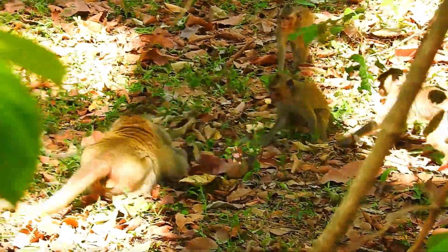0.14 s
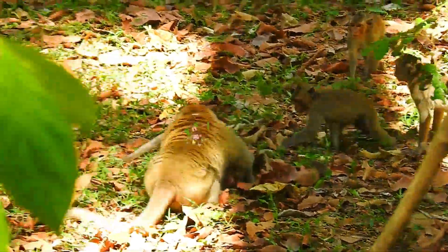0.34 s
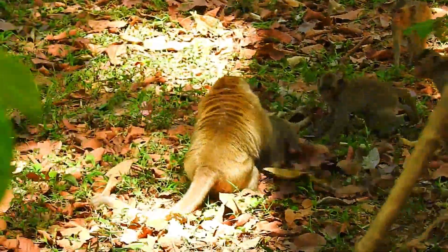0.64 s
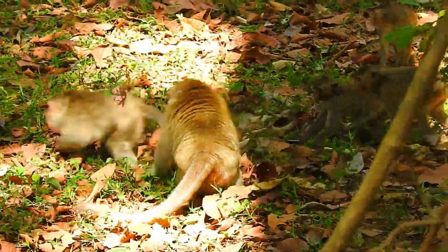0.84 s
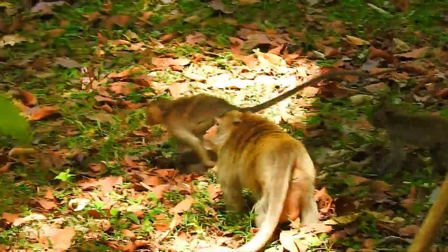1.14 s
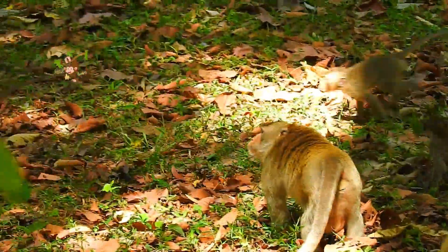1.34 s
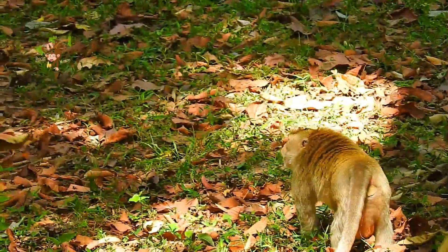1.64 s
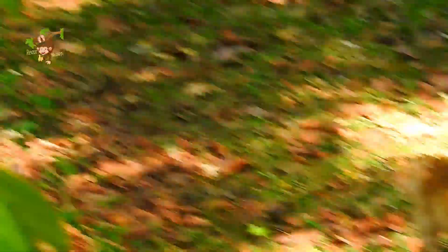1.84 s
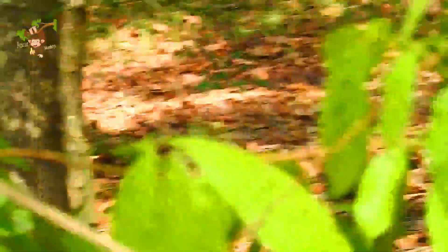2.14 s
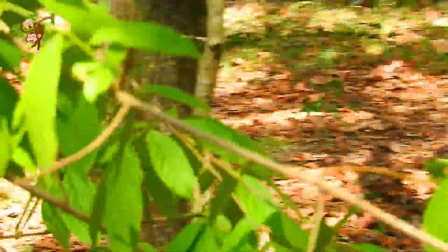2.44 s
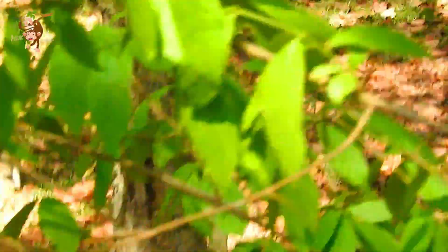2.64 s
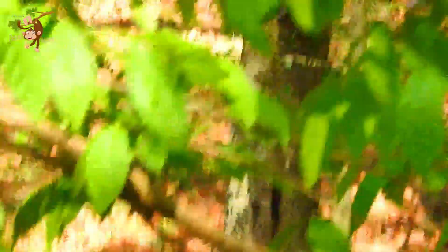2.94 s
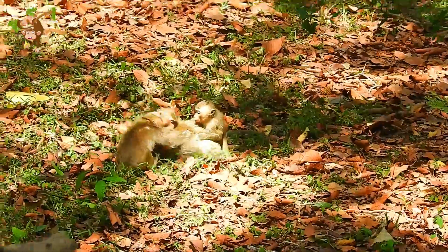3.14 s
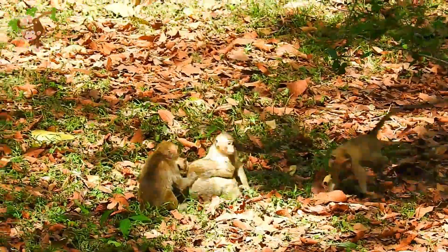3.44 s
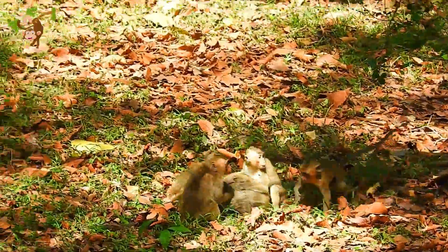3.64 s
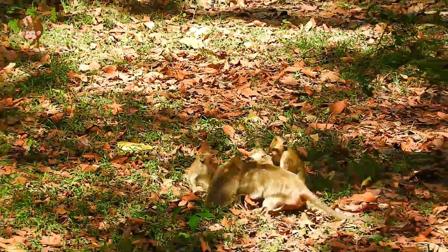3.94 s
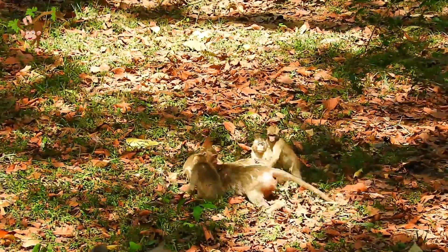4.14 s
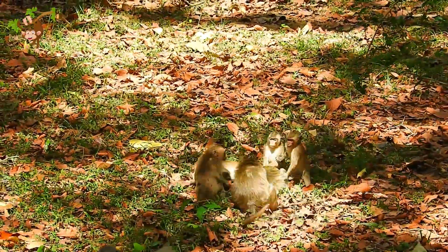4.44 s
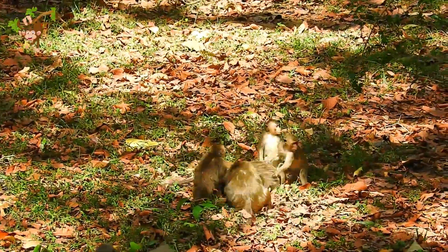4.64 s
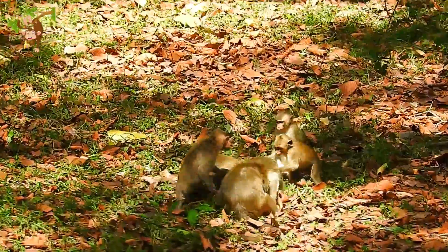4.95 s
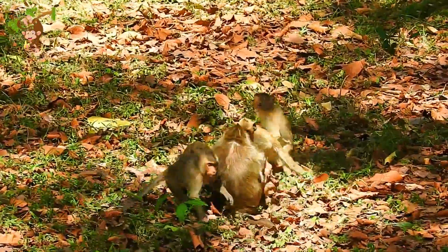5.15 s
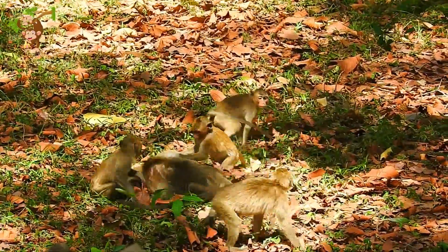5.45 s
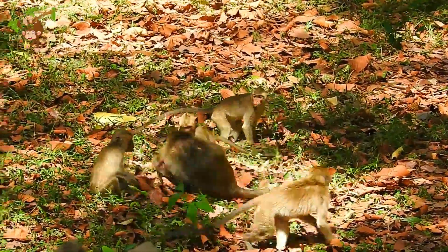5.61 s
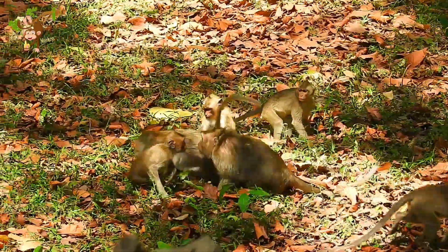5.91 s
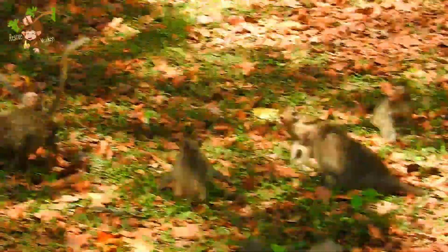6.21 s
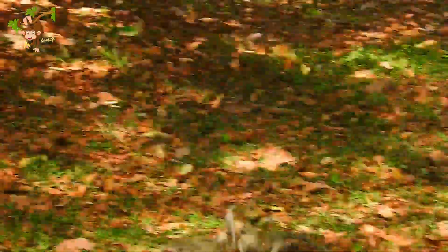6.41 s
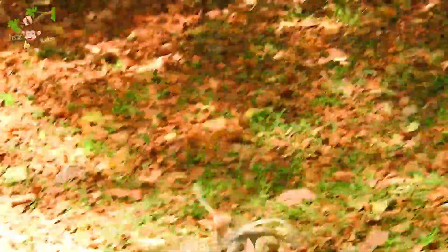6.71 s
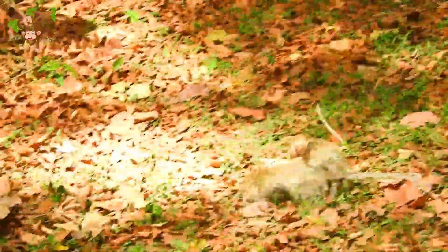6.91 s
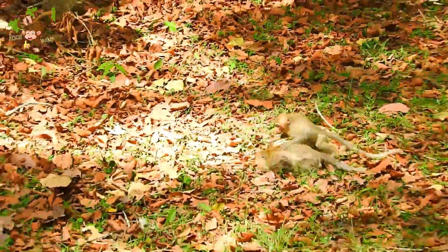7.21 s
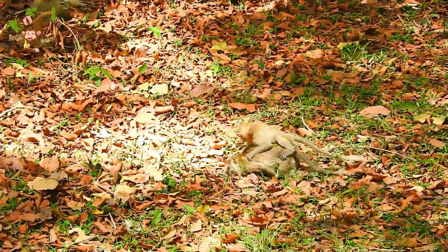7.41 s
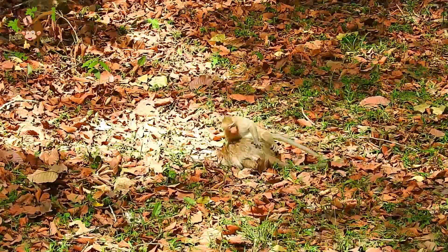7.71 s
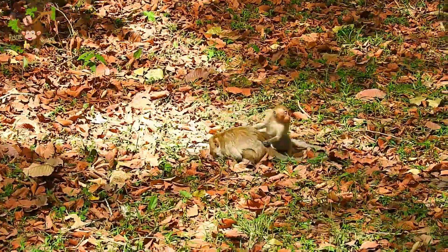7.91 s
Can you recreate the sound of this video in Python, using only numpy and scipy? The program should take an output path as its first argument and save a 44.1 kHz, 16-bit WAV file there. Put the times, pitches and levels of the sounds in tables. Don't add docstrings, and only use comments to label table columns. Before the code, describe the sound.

Monkeys scuffle outdoors: piercing, raspy shrieks in quick strings, low hoarse barks, rustling leaf litter, and a short total gap before the screaming resumes.

```python
import sys
import numpy as np
from scipy import signal
from scipy.fft import rfft, irfft, next_fast_len
from scipy.io import wavfile
from scipy.ndimage import uniform_filter1d, map_coordinates

SR = 44100
rng = np.random.default_rng(int(sys.argv[2]) if len(sys.argv) > 2 else 0)


def gain_from_db(level_db):
    decades = np.asarray(level_db, float) / 20
    return 10 ** decades


def materialize(psi):
    bounded = np.clip(np.atleast_2d(psi).T, -1, 1)
    quanta = np.round(bounded * 32767).astype(np.int16)
    wavfile.write(sys.argv[1], SR, quanta)


N = 355887
GONE_DB, STEP_S = 32, .04


def screams():
    # start_s, held_s, fade_db_per_s, first_hz, last_hz
    young_cries = [(0.107, 0.047, 595, 1458, 1124), (0.375, 0.11, 588.5, 1563, 1590),
                   (0.473, 0.05, 258, 2074, 2044), (.55, 0.14, 497.5, 2492, 2396),
                   (.68, 0.1, 333, 1808, 1170), (0.941, 0.025, 998, 2217, 2267),
                   (1.028, 0.047, 700, 2033, 2123), (1.082, 0.012, 400, 1820, 1770),
                   (1.424, 0.036, 585.5, 1560, 1803), (1.461, .07, 400, 1845, 1723),
                   (1.805, .045, 599.5, 1960, 1840), (1.854, .03, 499, 1945, 1880),
                   (2.09, 0.0479, 597, 2013, 1612), (2.164, 0.032, 501, 1790, 1718),
                   (2.226, 0.0066, 455, 1643, 1584),
                   (3.225, 0.031, 1200, 1727, 1924), (3.262, .052, 1200, 1923, 1665),
                  (3.317, .06, 259.5, 1662, 1582), (4.172, 0.08, 450, 2053, 2022),
                  (4.408, .052, 500.5, 2110, 2165), (4.458, .06, 210, 2313, 2264),
                  (4.768, 0.027, 497, 2270, 2385), (4.808, 0.0355, 401, 2280, 2154),
                  (5.055, .025, 600, 1503, 1588), (5.129, 0.025, 1499, 2276, 2049),
                  (5.152, .056, 1199, 2088, 1428), (5.221, 0.0655, 1000, 1530, 1484),
                  (5.298, .042, 349, 1789, 1540), (5.526, 0.04, 1501, 2243, 2335),
                  (5.562, 0.043, 601, 2215, 2344), (5.61, 0.018, 901, 2353, 1713),
                  (5.631, 0.043, 497, 1704, 1642), (5.675, 0.069, 503, 1693, 1393),
                  (5.904, .032, 900, 1617, 1935), (5.945, .066, 601.5, 2224, 2056),
                  (6.012, 0.041, 244, 1720, 1611), (6.421, 0.084, 500, 1491, 1539),
                  (6.488, 0.044, 596, 1563, 1723), (6.535, 0.033, 296, 1757, 1868),
                  (6.76, .04, 904, 2086, 2161), (6.8, .04, 449, 1956, 1481), (7.332, 0.04, 600, 1452, 1564)]
    other_cries = [(0.688, 0.079, 207, 3480, 3200), (4.45, .07, 152.5, 2730, 2570),
                   (4.764, 0.025, 900, 1520, 1800), (4.811, .04, 301.5, 1890, 1380),
                   (5.288, 0.03, 697.5, 1600, 2190), (5.525, .024, 1501, 1660, 2300),
                   (7.03, 0.041, 400, 3600, 3830), (7.12, 0.017, 598.5, 4000, 3700),
                   (7.525, 0.017, 399, 2262, 2200), (.005, .02, 252, 503, 544), (.84, 0.023, 400, 526, 523),
                   (2.48, .04, 400, 520, 480), (3.218, 0.045, 400.5, 2160, 2016),
                   (3.633, 0.0507, 400, 1496, 1415), (5.24, .04, 500, 2300, 2410),
                   (7.33, 0.027, 298, 6750, 6650), (7.525, .02, 300, 10500, 10300),
                   (1.9, 0.041, 600, 1330, 1197), (1.93, 0.027, 600, 1400, 1700),
                   (0.94, 0.022, 700, 1526, 1800), (1.11, .05, 301, 2057, 2000),
                   (7.525, .02, 500, 4990, 5100), (5.59, 0.064, 501, 2560, 2190),
                   (6.755, 0.046, 600, 1890, 1850), (4.22, 0.053, 400, 1680, 1630),
                   (5.085, .03, 500, 1850, 2050), (6.85, 0.039, 250, 1800, 1860),
                   (.47, .07, 299, 2720, 2600)]
    # fundamental_db, second_re_fundamental_db,
    # upper_re_fundamental_db, brighten_db_per_s, noisy_share
    young_voices = [(-38, -22, -21, 2.5, 0.09), (-64.5, 14, 17, 118.5, 0.5), (-26.5, -3, 10, -79, 0.7),
                    (-34.5, -4, 8.5, -3.5, 0.7), (-37, 2.5, 10.5, -97, .72), (-29.5, -24, -1.5, 200, 0.2),
                    (-30, -20.5, -2.5, 56, 0.35), (-32.5, -27, -9, -150, 0.28),
                    (-35, -17.5, 15.5, -0.5, .18), (-57, -3, 15, -3, 0.5), (-39.5, -15, 9.5, -64.5, 0.6),
                    (-33, -21.5, -2.5, -31, 0.7), (-29.5, -46, -15, 5, 0.3), (-33, -10.5, -1, 60, 0.4),
                    (-27.5, -14, -4.5, 100, 0.46),
                    (-51.5, -3, 21, 0, .1), (-42, -18, 15, 6, 0.09), (-38, -22, 10, -80, .3),
                   (-34.5, -9.5, -8.5, 10.5, .75), (-26.5, -9.5, 8.5, -62.5, 0.5), (-22, -16, -7, 3, .6),
                   (-39, -19, -7.5, 2, 0.6), (-21, -28.5, -20.5, -1, 0.53), (-44, -28.5, -8, 102, 0.5),
                   (-21, -44, -18, 100, 0.17), (-27, -16.5, -5.5, -3, .6), (-26.5, -4.5, 0, 3, .26),
                   (-28.5, -0.5, -5, 0, 0.7), (-27, -31, -10, 0.5, 0.28), (-52.5, 6, 23.5, 0, 0.8),
                   (-32.5, 8.5, 14, 2, 0.6), (-31.5, 9, 9.5, 0.5, .75), (-28.5, 0.5, 5, -55, .2),
                   (-57, 2, 24, 148.5, 0), (-37.5, -31, 10.5, -1, .7), (-38.5, -37, 18.5, -30, .55),
                   (-43, -28, -3, 0, 0.4), (-30.5, -21.5, 6, -63, 0.6), (-36, -2, 10.5, 3, .65),
                   (-32, -7.5, 4.5, -2, .5), (-34, -9, 10.5, 2, 0.5), (-40, -31, -4.5, -2, 0.14)]
    other_voices = [(-34.5, -30, -23.5, 0.5, 0.6), (-27.5, -42, -14, -7, 0.33), (-61, -8.5, 23, -1.5, 0.02),
                    (-37, -6, -1.5, -2, 0.5), (-29, -14.5, -16, -50, 0.3), (-51.5, 12.5, 30, 4.5, 0.05),
                    (-55, -30, -24.5, -1, 0.76), (-57, -30, -9, -1, 0.8), (-60, -21, -4, 1, 0.28),
                    (-53, -22, -27, 0, 0.4), (-59, -30, -24.5, 0, .3), (-53.5, -31, -27, 0, 0),
                    (-47, -18, -10, 0, 0.72), (-53, -22, 9.5, 2, 0.56), (-40, -15, -13.5, 0, 0.3),
                    (-42.5, -40, -40, 0, 0.88), (-67, -40, -40, 0, 0.7), (-43, -30, -20.5, 0.5, 0.9),
                    (-43.5, -32, -20, 1, 0.69), (-41.5, -30, -7, 0, 0.8), (-49, -20, -0.5, -1, 0.7),
                    (-59, -40, -40, 0, 0.9), (-31, -9.5, -10, 1, 0.7), (-44.5, 0.5, 22, 0, .4),
                    (-43, -8.5, -7.5, 0, .8), (-50, -30, 5, 0, .6), (-47.5, -7, 6.5, 0, .8),
                    (-32.5, -20, -15, 0, .9)]
    early_throats = [1.09, 1.035, 1.02, 1.05, 0.88, 0.95, 1, 1.2, 1.088, 0.98, 1.07, 1.15, 1.26, 1.02, 0.96]
    late_throats = [1.035, 0.97, 0.96, .92, 1.03, .86, 1.2, .88, 1.06, 1.01, .92, 0.9, 0.92, 1.01, 0.97,
                    .93, 0.94, 0.95, 0.96, 1.085, 0.98, 1.01, 1.01, 0.96, 0.96, 0.98, 0.96]
    other_throats = [1.2, .9, 1.08, 0.84, .95, 1.054, 1.01, 0.85, 1.1, 1.01, 1.01, 1.01, 1.01, 0.88, 1.01,
                     1.024, 1.02, 1.01, 1.01, 1.01, 1.01, 1.01, 1.1, 1.015, 0.93, 0.99, 1, 1.01]
    track = np.zeros((2, N))
    track = voice(track, young_cries, young_voices,
                  early_throats + late_throats, trim_db=-3, wet_db=-4)
    return voice(track, other_cries, other_voices, other_throats, trim_db=-1.5, wet_db=-2.5)


def voice(track, cries, voices, throats, trim_db, wet_db):
    attack_s, attack_db = .017, 6.5
    glide_db, glide_bend = 5, 1.15
    waver, waver_hz = .016, 35
    catch_db, catch_hz = 1.2, 60
    fray_per_db = 0.011
    for cry_row, voice_row, stretch in zip(cries, voices, throats):
        start_s, held_s, fade, first_hz, last_hz = cry_row
        db, second_db, upper_db, brighten, harsh = voice_row
        end_s = held_s + GONE_DB / fade
        t = span(0, end_s)
        faded_db = fade * np.clip(t - held_s, 0, None)
        effort_db = db - attack_db * np.clip(1 - t / attack_s, 0, 1) - faded_db
        to_go = np.clip(1 - t / (held_s + glide_db / fade), 0, 1) ** glide_bend
        hz = last_hz + (first_hz - last_hz) * to_go
        hz = hz * (1 + waver * 2 * np.clip(harsh, 0, 1) * wobble(waver_hz, len(t)))
        effort_db = effort_db + catch_db * wobble(catch_hz, len(t))
        frayed = np.clip(harsh + fray_per_db * faded_db, 0, 1)
        sound = cry(hz, effort_db, effort_db + second_db, effort_db + upper_db + brighten * t, frayed, stretch)
        edge = np.clip(np.minimum(t, end_s - t) / 0.0026, 0, 1)
        floor = [(.55 * hz.min(), -40), (.8 * hz.min(), 0)]
        add(track, round(start_s * SR), gain_from_db(trim_db) * filtered(edge * sound, floor), wet_db)
    return track


def cry(hz, low_db, second_db, upper_db, harsh, stretch):
    # freq_hz, level_db_per_hz
    throat_shape = [(1530, -38.5), (2600, -27), (3230, -17.5), (3860, -10), (4620, -3.5), (6320, 15.5),
                    (7620, 4.5), (8920, -7.5), (12100, -23), (15500, -43)]
    split_hz = 4300
    n = len(hz)
    throat = [(f * stretch, db) for f, db in throat_shape]
    phase = 2 * np.pi * np.cumsum(hz * (1 + 0.01174 * wobble(89.9, n))) / SR
    flutter = gain_from_db(2.4 * wobble(120, n) - 3.5)

    def partial(order, share):
        smear = unit(wobble(600 * order ** .6, n) + 1j * wobble(600 * order ** 0.56, n))
        line = np.sqrt(1 - share) + np.sqrt(share) * smear
        return np.sqrt(2) * np.real(line * np.exp(1j * order * phase))

    upper, power = 0, 0
    for k in range(2, 11):
        gain = gain_from_db(along(throat, k * hz) + 3 * wobble(40, n))
        if k == 2:
            gain = gain * (2 * hz > split_hz)
        upper = upper + gain * partial(k, harsh ** 1.1)
        power = power + gain * gain
    upper = upper / np.sqrt(power)
    breath = unit(filtered(rng.standard_normal(n) * (1 + 1.8 * np.cos(phase)), throat))
    upper = np.sqrt(1 - .65 * harsh) * upper + np.sqrt(.65 * harsh) * breath

    second = partial(2, harsh ** 3.1) * (2 * hz <= split_hz)
    gap_shape = [(1900, -26.5), (2500, 0.5), (3300, 10.0), (4200, 2.0), (5200, -35.5)]  # freq_hz, db
    gap = unit(filtered(rng.standard_normal(n), gap_shape))
    blur = np.where(2 * hz > split_hz, 1, harsh * harsh)
    second = np.sqrt(1 - blur) * second + np.sqrt(blur) * gap

    first = partial(1, harsh ** 2.4)
    return flutter * (gain_from_db(low_db) * first + gain_from_db(second_db) * second + gain_from_db(upper_db) * upper)


def barks():
    # peak_s, rise_db_per_s, fall_db_per_s, level_db, mouth_hz
    bark_rows = [(.926, 219.5, 154, -46.5, 1160), (1.615, 901, 199.5, -32.5, 1380),
                 (1.65, 350, 201, -35, 1370), (1.685, 250.5, 357, -35, 1370), (1.67, 219.5, 352, -42, 995),
                 (1.77, 199.5, 150, -51, 1350), (2.2, 200, 152, -47.5, 1180), (1.809, 299.5, 87, -45, 1370),
                 (1.949, 90, 366, -43.5, 1420), (2.44, 250, 74, -51, 860), (2.615, 91, 241, -42, 1065),
                 (3.755, 499.5, 183, -44, 940), (.185, 253.5, 253, -60.5, 1940),
                 (1.44, 250, 251.5, -53.5, 914), (4.06, 89.5, 153, -51, 1109),
                 (4.65, 81.5, 146, -46.5, 1218), (6.306, 87, 18, -60, 975),
                 (7.042, 430.5, 105, -60.5, 1210), (7.125, 300, 152, -57, 920), (.365, 301, 400, -60, 1460),
                 (7.29, 601, 150, -58, 948)]
    # freq_hz, gain_db
    mouth_shape = [(350, -12.5), (750, -1.5), (1700, -3.5), (2600, -32), (6000, -35.5)]
    sag_per_s = 0.6
    pulse_hz, width_hz = 260, 400
    track = np.zeros((2, N))
    for peak_s, rise, fall, peak_db, mouth_hz in bark_rows:
        t = span(GONE_DB / rise, GONE_DB / fall)
        start, n = round((peak_s + t[0]) * SR), len(t)
        hz = mouth_hz * (1 - sag_per_s * t)
        db = peak_db + surge(t, rise, fall)
        cycles = np.cumsum(pulse_hz * gain_from_db(3.1 * wobble(150, n))) / SR
        beats = np.diff(np.floor(cycles), prepend=0)
        push = beats * gain_from_db(3.5 * rng.standard_normal(n)) + .06 * rng.standard_normal(n)
        turn = np.exp(2j * np.pi * np.cumsum(hz) / SR)
        pole = np.exp(-np.pi * width_hz / SR)
        ring = signal.lfilter([1], np.poly([pole, pole]), push / turn) * turn
        add(track, start, gain_from_db(db - 3.0) * unit(filtered(ring.real, mouth_shape)), wet_db=1.0)
    return track


def leaves():
    # peak_s, rise_db_per_s, fall_db_per_s, level_db
    scuffles = [(0, 100, 62, -51.5), (.92, 303.5, 35.5, -43), (1.23, 56, 153, -47.5), (1.5, 93, 18, -43.5),
                (1.94, 57.5, 111, -36), (2.1, 403, 32, -43.5), (2.38, 61, 87, -42.5), (2.599, 84, 121, -41),
                (3.15, 400, 32, -51.5), (3.46, 19, 36, -54.5), (3.675, 313, 204, -39),
                (3.76, 111, 298, -39.5), (3.87, 198, 125, -49), (4.062, 244, 43, -45), (4.4, 43, 33, -53),
                (4.76, 499, 80, -52), (5.45, 63, 120.5, -48.5), (5.83, 40.5, 377.5, -43),
                (6.18, 15, 38, -50), (6.72, 38.5, 63, -36), (7.13, 34, 602, -65), (7.6, 58, 6, -60.5),
                (7.96, 180.5, 122, -62)]
    # freq_hz, level_db_per_hz
    leaf_shape = [(1060, -14.5), (1800, -12.5), (2470, -12.5), (3940, -6.5), (4310, -4), (6300, 1),
                  (8630, -17.5), (10300, -25), (15500, -51.5)]
    grains_per_s = 1500
    hits = rng.random((3, N)) < grains_per_s / SR
    sizes = gain_from_db(5.7 * np.minimum(rng.exponential(size=(3, N)), 3))
    grains = hits * sizes * rng.standard_normal((3, N))
    mix = filtered(0.56 * unit(grains) + rng.standard_normal((3, N)), leaf_shape)
    patches = gain_from_db(2.07 * wobble(22, N))
    t = np.arange(0, N / SR, .002)
    power = sum(gain_from_db(2 * (db + surge(t - peak_s, rise, fall))) for peak_s, rise, fall, db in scuffles)
    busy = curve(np.transpose([t, np.sqrt(power)]))
    return gain_from_db(-1.5) * busy * patches * unit(patchy(mix[:2] + 0.34 * mix[2]))


def snaps():
    # start_s, peak_db, knock_re_peak_db, left_right_db
    twig_snaps = [
        (2.4696, -25, -20.5, -6.5),
        (2.515, -34.5, -8, 1),
        (2.5485, -31.5, -8.5, 2.5),
        (3.7312, -31, -23, 0),
        (3.7498, -43, -16, 2),
        (6.2911, -37, -44, 0),
        (6.4003, -37, -32, -1.0),
        (7.281, -50.5, -12, -8),
        (7.626, -50, -19, -4.5),
                  (3.5144, -48, -30, -1),
        (3.5746, -43, -32, -3),
        (3.865, -43, -39, -2.5),
        (4.0477, -45, -34, -1.5),
        (6.694, -39, -28.5, 0),
        (7.1114, -48, -22, -.5),
        (7.5305, -47, -28, -3),
    ]
    # freq_hz, level_db_per_hz
    twig_shape = [(700, -11.5), (2000, -28.5), (3500, 1), (6500, 11), (9000, -4.5), (12000, -25),
                  (15500, -62)]
    # freq_hz, level_db_per_hz
    wood_shape = [(500, -26), (1000, 8), (3500, 1.5), (5000, -29), (9000, -49.5)]
    crack_t60_s, knock_t60_s, split_t60_s = .026, .035, .016
    track, t = np.zeros((2, N)), np.arange(SR // 40) / SR

    def burst(t60_s, shape):
        noise = rng.standard_normal(len(t)) * gain_from_db(-60 * t / t60_s)
        x = filtered(np.roll(noise, 20), shape)
        return x / np.abs(x).max()

    for start_s, db, knock_db, pan_db in twig_snaps:
        crack = 3.0 * burst(crack_t60_s, twig_shape)
        knock_hz = 950 * gain_from_db(rng.normal(0, 1))
        knock = np.sin(2 * np.pi * knock_hz * t) * gain_from_db(knock_db - 60 * t / knock_t60_s)
        knock = knock + gain_from_db(knock_db + 5.5) * burst(split_t60_s, wood_shape)
        snap = gain_from_db(db) * left_right(pan_db) * (0.46 * crack + 3.95 * knock)
        track[:, round(start_s * SR):][:, :len(t)] += snap
    return track


def ticks():
    # start_s, peak_db, nominal_hz (the wavelet rings at 0.84 times this)
    tick_rows = [
        (0.917, -17, 1724),
        (2.084, -10.5, 1805),
    ]
    track, t = np.zeros((2, N)), np.arange(SR // 40) / SR
    u = t - .001
    for start_s, db, hz in tick_rows:
        tick = gain_from_db(db) * np.cos(2 * np.pi * 0.84 * hz * u) * np.exp(-(u / 0.00052) ** 2)
        track[:, round(start_s * SR):][:, :len(t)] += tick
    return track


def air():
    # time_s, level_db
    rumble_db = [(0, -65.5), (.29, -68.5), (1.41, -71.5), (2.0, -66.5), (2.16, -68.5), (2.8, -69.5),
                 (3.14, -60), (3.35, -68.5), (3.73, -64), (3.89, -70), (4.7, -64.5), (5.0, -69),
                 (5.59, -64), (5.96, -74.5), (6.4, -60), (6.7, -70), (7.6, -62), (7.8, -72)]
    # freq_hz, level_db_per_hz
    rumble_shape = [(25, -36), (45, -20), (65, 0), (100, -8), (180, -4.5), (260, -7.5), (400, -17.5),
                    (700, -43.5)]
    # freq_hz, level_db_per_hz
    hiss_shape = [(300, -21), (600, 0.5), (900, 1), (2000, -4), (4000, -12), (6200, -7.5), (9000, -25),
                  (15500, -54)]
    low = filtered(rng.standard_normal((3, N)), rumble_shape)
    high = filtered(rng.standard_normal((3, N)), hiss_shape)
    swell_db = 1.8 * wobble(9, N)
    shared = filtered(low[2], [(80, -20), (130, 0)])
    rumble = gain_from_db(curve(rumble_db) + 1.5 + swell_db) * unit(low[:2] + shared)
    hiss = gain_from_db(-64.3 + 1.2 * wobble(2.1, N)) * unit(patchy(high[:2] + .5 * high[2]))
    return rumble + hiss


def add(track, start, x, wet_db):
    # freq_hz, t60_s
    trunk_t60 = [(500, 0.093), (2000, 0.29), (7000, 0.33), (14000, 0.25)]
    ground_t60_s, ground_db = .012, -1
    hz, t, z = signal.stft(rng.standard_normal((2, SR // 5)), SR, nperseg=256)
    decay = gain_from_db(-60 * t / along(trunk_t60, hz)[:, None])
    tail = signal.istft(z * decay, SR, nperseg=256)[1]
    tail = gain_from_db(wet_db) * tail / np.linalg.norm(tail[0])
    n = SR // 80
    near = rng.standard_normal((2, n)) * gain_from_db(-60 * np.arange(n) / SR / ground_t60_s)
    tail[:, :n] += gain_from_db(ground_db) * near / np.linalg.norm(near[0])
    tail[[0, 1], [2, rng.integers(0, 4)]] += 1
    heard = signal.fftconvolve(x[None], tail, axes=1)[:, :N - start]
    level = np.linalg.norm(x) * np.linalg.norm(tail[0])
    heard = heard * level / np.linalg.norm(heard, axis=1, keepdims=True)
    track[:, start:start + heard.shape[1]] += heard


def patchy(x):
    z = signal.stft(x, nperseg=512)[2]
    field = uniform_filter1d(rng.standard_normal(z.shape[1:]), size=9, axis=0)
    field = uniform_filter1d(field, size=7, axis=1)
    return signal.istft(z * gain_from_db(3 * unit(field)), nperseg=512)[1][:, :N]


def span(before, after):
    length_s = np.ceil((before + after) / STEP_S) * STEP_S
    return np.arange(round(length_s * SR)) / SR - before


def surge(t, rise, fall):
    return np.minimum(rise * t, -fall * t)


def wobble(rate, size):
    knots = rng.standard_normal(int(size * rate / SR) + 4)
    return map_coordinates(knots, [np.arange(size) * rate / SR])


def filtered(x, points):
    m = next_fast_len(x.shape[-1] + 4096)
    gain = gain_from_db(along(points, np.fft.rfftfreq(m, 1 / SR)))
    return irfft(rfft(x, m) * gain, m)[..., :x.shape[-1]]


def unit(x):
    return x / np.sqrt(np.mean(np.abs(x) ** 2) + 1e-20)


def along(points, hz):
    f, v = np.transpose(points)
    return np.interp(np.log(hz + 1), np.log(f + 1), v)


def curve(rows):
    s, v = np.transpose(rows)
    return np.interp(np.arange(N) / SR, s, v)


def left_right(pan_db):
    return gain_from_db(np.array([[.5], [-.5]]) * pan_db)


def scene():
    # time_s, left_right_db
    group_pan = [(0.0, -2), (0.6, -0.2), (2.2, 0), (2.7, 0), (4.2, -1.3), (5.7, -1), (6.1, -2.5),
                 (6.7, -0.2), (7.33, -1.5), (8.07, -1)]
    group = screams() + barks() + leaves()
    return left_right(curve(group_pan)) * group + snaps() + ticks() + air()


def roll_off(x):
    return signal.sosfilt(signal.butter(12, 15750, fs=SR, output="sos"), x)


def record(dry):
    # time_s, gain_db
    change_db = [(2.85, 0), (2.875, -10), (2.91, -60), (2.912, -200), (3.085, -200), (3.088, -45),
                 (3.125, 0)]
    # freq_hz, gain_db
    bass_shape = [(380, 0), (520, -200)]
    ahead, bass_share = 768, .85
    early = np.pad(dry, ((0, 0), (0, ahead)))[:, ahead:]
    level = np.sqrt(np.abs(uniform_filter1d(np.mean(early ** 2, axis=0), size=256)))
    bass = filtered(early, bass_shape)
    share = 0.45 / (1e-6 + level / 0.0031) ** 0.37
    mix = dry + share * (early - bass) + bass_share * bass
    return roll_off(gain_from_db(curve(change_db)) * mix)


dry = scene()
out = record(dry)
materialize(out)
```